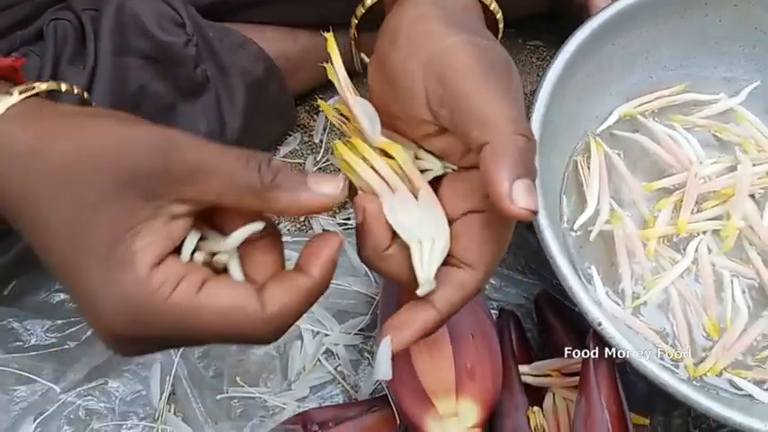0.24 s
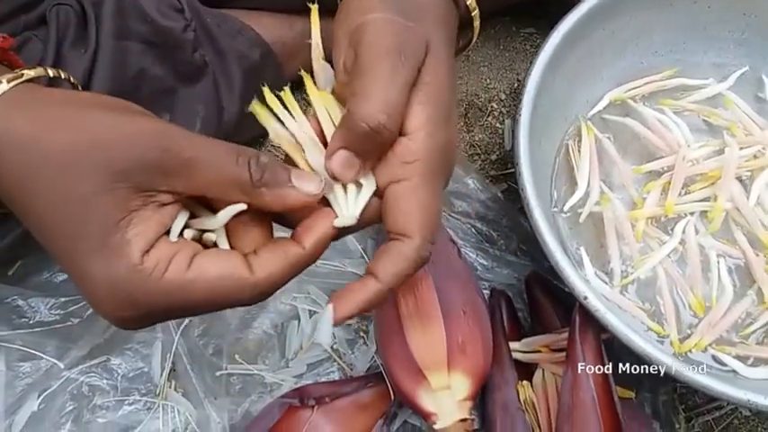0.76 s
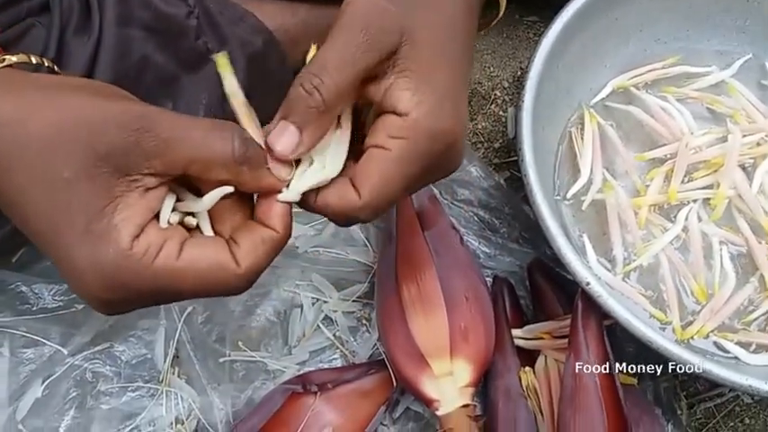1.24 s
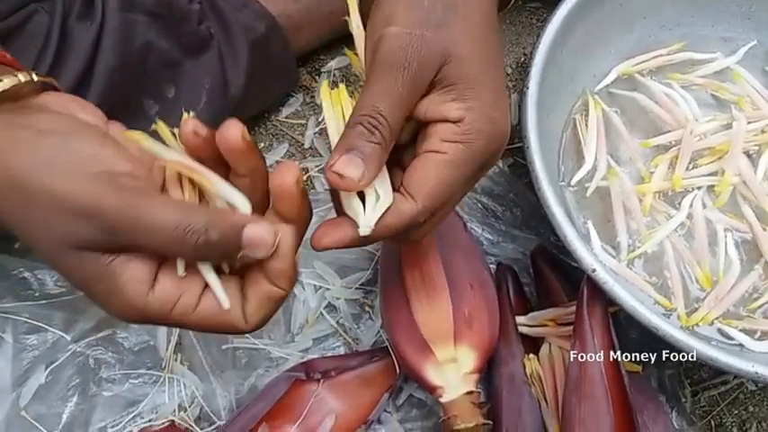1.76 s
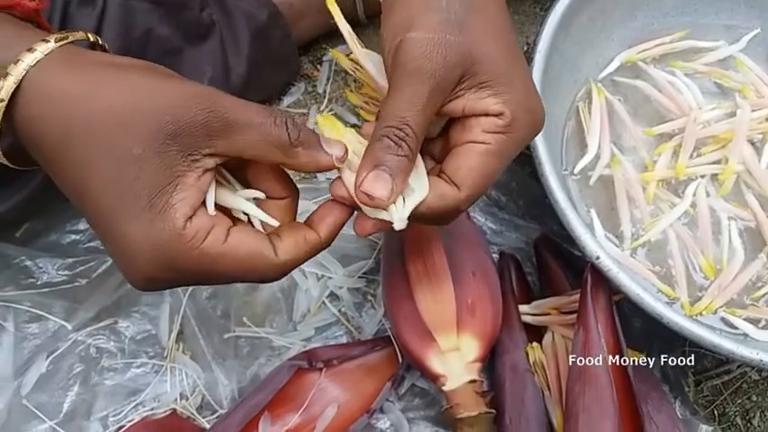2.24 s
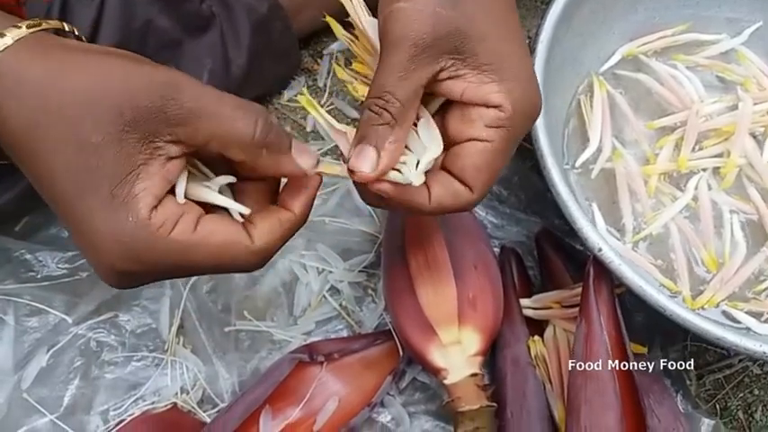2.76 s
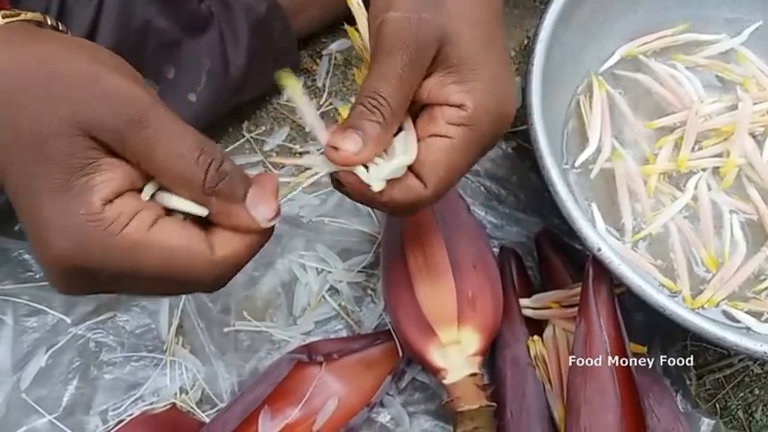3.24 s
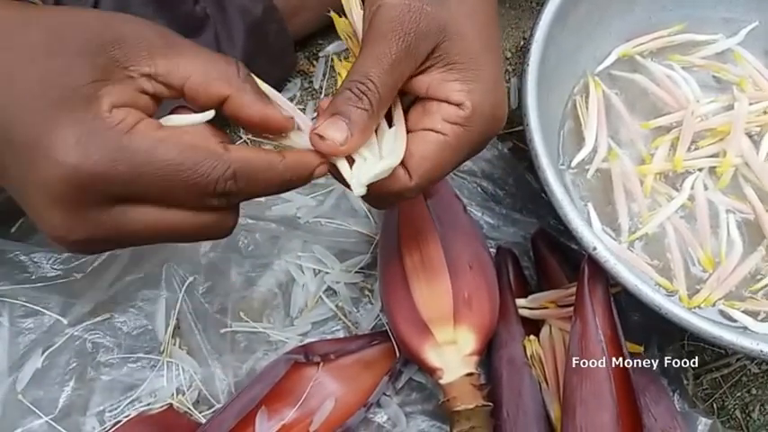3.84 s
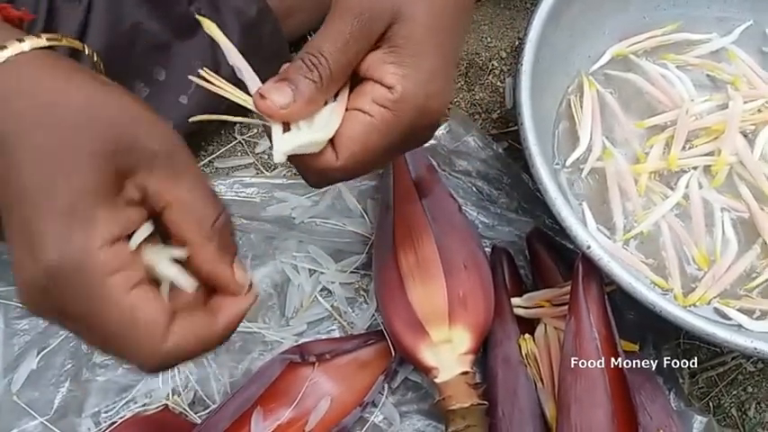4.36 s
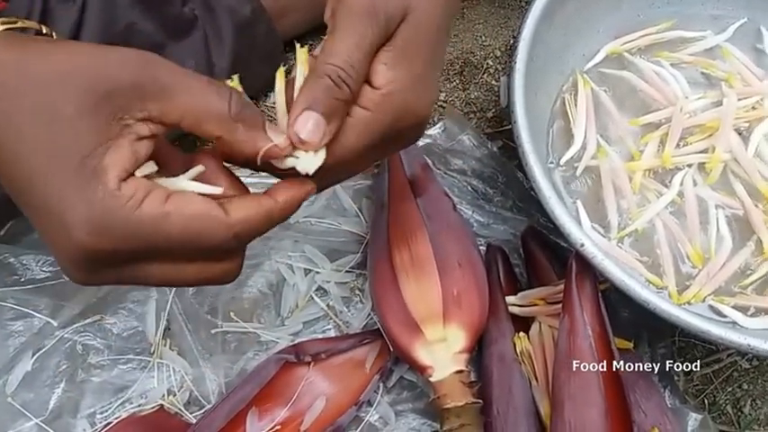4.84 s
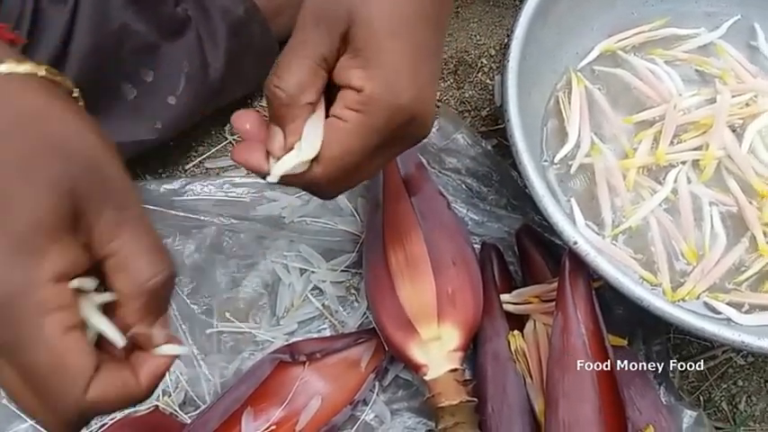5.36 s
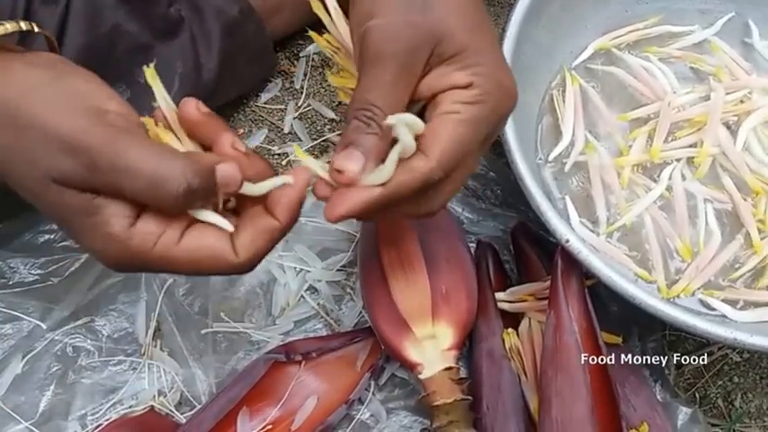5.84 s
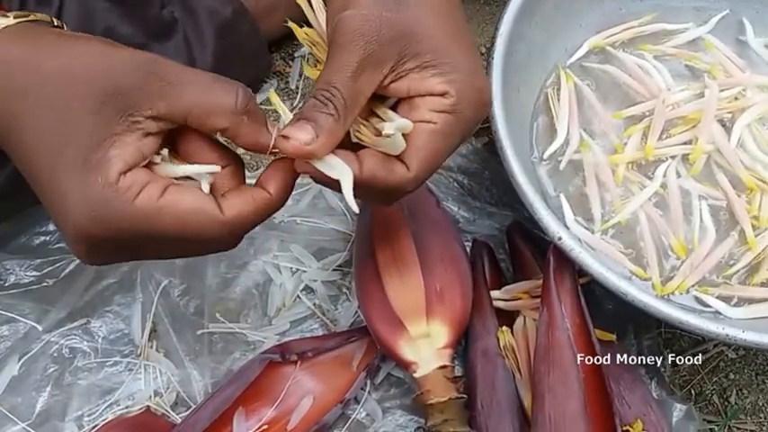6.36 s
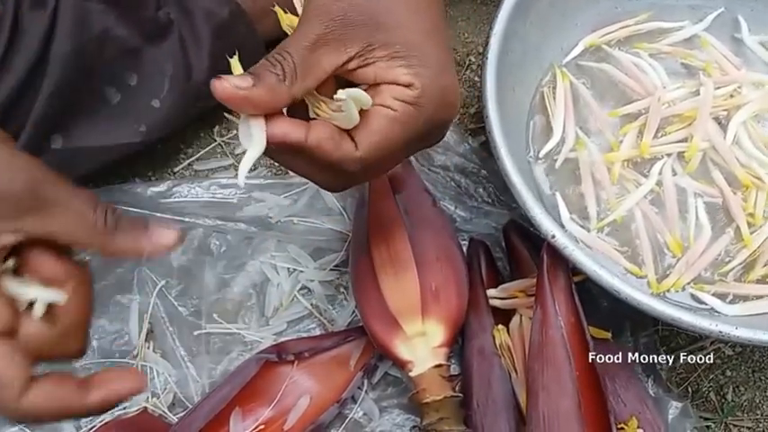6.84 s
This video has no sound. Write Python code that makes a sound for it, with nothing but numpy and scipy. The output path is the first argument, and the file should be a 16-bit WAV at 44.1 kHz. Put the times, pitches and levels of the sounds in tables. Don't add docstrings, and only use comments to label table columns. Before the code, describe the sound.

Crisp little stem snaps and soft petal rustles up close, with five fluttering crow caws, faint bird chatter and a low puttering engine behind.

```python
import sys
import numpy as np
from scipy import signal
from scipy.fft import rfft, irfft
from scipy.io import wavfile
from scipy.ndimage import uniform_filter1d

SR = 44100
rng = np.random.default_rng(int(sys.argv[2]) if len(sys.argv) > 2 else 0)


def master_out(mix):
    frames = np.transpose(np.atleast_2d(mix))
    ceiling = np.clip(frames, -1, 1)
    pcm = np.round(ceiling * 32767).astype(np.int16)
    wavfile.write(sys.argv[1], SR, pcm)


def attenuation_scalar(level_db):
    decades = np.asarray(level_db, float) / 20
    return 10 ** decades


N = 312669


def rms_one(x):
    return x / np.sqrt(np.mean(x ** 2) + 1e-20)


def even(x, size=1300):
    return x / np.sqrt(uniform_filter1d(x ** 2, size=size) + 1e-12)


def short_of(t, length):
    return np.clip(1 - t / length, 0, 1)


def span(start, length):
    at = np.arange(int(start * SR), min(int((start + length) * SR), N))
    fade = np.minimum(1, np.minimum(at - at[0], at[-1] - at) / (0.0016 * SR))
    return at, fade, at / SR - start


def drift(rate_hz, size):
    r = np.exp(-2 * np.pi * rate_hz / SR)
    noise = rng.standard_normal(size + SR)
    return rms_one(signal.lfilter([1], [1, -2 * r, r * r], noise)[SR:])


def resonate(x, modes):
    out = 0
    for k, (hz, width_hz, db) in enumerate(modes):
        r = np.exp(-np.pi * width_hz / SR)
        zeros = [(1 - r * r) / 2, 0, (r * r - 1) / 2]
        poles = [1, -2 * r * np.cos(2 * np.pi * hz / SR), r * r]
        out = out + (-1) ** k * attenuation_scalar(db) * signal.lfilter(zeros, poles, x)
    return out


def bursts(times, db, lengths):
    out = np.zeros(N + SR)
    for s, level_db, length in np.broadcast(times, db, lengths):
        u = np.arange(int(8 * length * SR)) / (length * SR)
        i = int(max(s, 0) * SR)
        out[i:i + len(u)] += attenuation_scalar(level_db) * (1 - np.exp(-6.0 * u)) * np.exp(-u)
    return out[:N]


def air():
    # f/Hz, density/dB
    air_colour = [(160, -30), (280, 1), (497, -4.5), (853, -3), (960, -6), (1060, -2.5), (2270, -5),
                  (2730, -6), (3070, -6), (6460, -21.5), (7910, -20.5), (9520, -25.5), (15800, -25)]
    # f/Hz, level/dB
    air_bass = [(40, -18), (90, 9), (140, 5.5), (190, 9.5), (230, 6.5), (270, -9), (340, -1), (450, -1.24)]
    # f/Hz, width/Hz, gain
    mic_peak = (7980, 480, 2.9)
    level_db, top_hz = -53.5, 15850
    bins_hz = np.arange(N // 2 + 1) * SR / N
    colour_db = 0
    for table in (air_colour[1:], air_bass):
        hz, db = np.transpose(table)
        colour_db = colour_db + np.interp(np.log(bins_hz + 1), np.log(hz), db)
    far = irfft(rfft(rng.standard_normal(N)) * attenuation_scalar(colour_db) * (bins_hz < top_hz), N)
    peak_hz, peak_width_hz, peak_gain = mic_peak
    far += peak_gain * attenuation_scalar(2.74 * drift(27, N)) * resonate(far, [(peak_hz, peak_width_hz, 0)])
    high = signal.sosfilt(signal.butter(2, 300, "high", fs=SR, output="sos"), far)
    return far / np.std(high) * attenuation_scalar(level_db - 1.5 + 0.74 * drift(7.3, N))


def wind():
    # t/s, rumble level/dB, width/s
    gusts = [(.02, -42.5, .06), (.39, -45, 0.032), (.7, -46.5, 0.18), (1.05, -49, 0.031),
             (1.38, -50, 0.065), (2.2, -61, 0.4), (3.1, -54, 0.14), (3.53, -49, 0.06), (3.95, -57, 0.17),
             (4.29, -47, 0.044), (4.76, -56, .03), (5.3, -40.5, 0.12), (5.77, -48, .05), (5.96, -45, 0.043),
             (6.18, -44, .06), (6.42, -43.5, 0.051), (7.04, -43, 0.067)]
    # t/s, peak/dB, f/Hz, length/s
    bumps = [(1.02, -31.5, 92, 0.013), (3.077, -48, 69, 0.025), (3.502, -49, 69, 0.02),
             (4.243, -48, 81, 0.023), (4.278, -39, 71.4, 0.012), (5.078, -36.5, 101.3, 0.011),
             (5.239, -46, 72.7, 0.015), (5.299, -38.5, 96, 0.026), (5.376, -61, 89, 0.03),
             (5.739, -36.5, 92.5, 0.02), (6.118, -40, 62.5, 0.019), (6.995, -35, 93, 0.013)]
    calm_db = -58
    t = np.arange(N) / SR
    gusting = attenuation_scalar(calm_db)
    for s, db, width_s in gusts:
        gusting = gusting + attenuation_scalar(db) * np.exp(-.5 * ((t - s) / width_s) ** 2)
    band = signal.butter(2, [40, 95], "band", fs=SR, output="sos")
    rumble = signal.sosfilt(band, rng.standard_normal(N))
    out = even(rumble) * gusting * attenuation_scalar(-11.0 + 0.5 * drift(35, N))
    for s, db, hz, length in bumps:
        out += np.sin(2 * np.pi * hz * (t - s)) * bursts(s, db + 3.0, length)
    return out


def each_cycle(contacts, spread_db):
    # valve tick t/s, cycles done
    turning = [(-.0652, -1), (1.0252, 10), (2.0139, 20), (3.1044, 31), (4.195, 42), (5.0859, 51),
               (6.0752, 61), (7.159, 72)]
    s, cycles = np.transpose(turning)
    out = 0
    for share, db, length in contacts:
        times = np.interp(np.arange(-1, 71) + share, cycles, s)
        levels_db = db + spread_db * rng.standard_normal(len(times))
        out = out + bursts(times[times > 0], levels_db[times > 0], length)
    return out


def engine():
    # f/Hz, level/dB, T60/s
    exhaust = [(39.7, -81, 0.16), (89.4, -49, 0.096), (128.9, -53.5, 0.23), (180, -42, 0.079),
               (206.4, -47, 0.11), (244, -94, 0.086), (390, -52, 0.044)]
    # cycle share after the tick, level/dB, length/s
    firing = [(.437, 1.5, 0.0018), (.54, -6, 0.0028), (.68, 0, 0.00068), (.785, -7.5, 0.0012),
              (.9, -6.5, 0.0014)]
    # cycle share, level/dB, length/s
    valve_puffs = [(.0, -49, 0.0054), (.1, -57, 0.0034), (.19, -51.5, 0.0079), (.26, -57, 0.0057),
                   (.37, -56, 0.0033), (.45, -57, 0.0092), (.56, -57.5, 0.0064)]
    valve_ticks = [(.008, -61, 0.0012), (.51, -76, 0.003)]
    # t/s, peak/dB
    hard_ticks = [(0.2312, -43), (0.528, -46), (0.827, -49), (1.0246, -49), (1.4224, -51), (1.8158, -57),
                  (2.0138, -57), (2.4104, -52), (3.502, -49), (3.6002, -51), (3.897, -45), (4.5895, -45),
                  (4.887, -44), (5.0853, -53), (5.1837, -45), (5.3827, -46), (5.5802, -52), (5.682, -43.5),
                  (6.0746, -50), (6.4684, -48), (6.567, -51), (6.8636, -47), (6.9606, -46)]
    # f/Hz, width/Hz, level/dB
    casing = [(2722, 120, 17), (1630, 134, 6.5), (835, 24, 12), (1080, 33, -2)]
    tick_colour = [(7950, 600, 0), (4500, 2500, -13), (10000, 1500, -22)]

    push = np.diff(each_cycle(firing, 1.7), prepend=0)
    pipe = 0
    for hz, db, t60_s in exhaust:
        r = attenuation_scalar(-60 / (t60_s * SR))
        w = 2 * np.pi * hz / SR
        ring = signal.lfilter([0, np.sin(w)], [1, -2 * r * np.cos(w), r * r], push)
        pipe = pipe + attenuation_scalar(db + 1.0) / w / 60 * ring

    puffs = even(resonate(rng.standard_normal(N), casing), size=300) * each_cycle(valve_puffs, 0.55)
    s, db = np.transpose(hard_ticks)
    striking = each_cycle(valve_ticks, 2.9) + bursts(s, db - 8.5, 0.0022)
    ticks = even(resonate(rng.standard_normal(N), tick_colour), size=90) * striking
    return pipe + puffs + 1.8 * ticks


def small_birds():
    # t/s, length/s, level/dB, fading/(dB/s), low voice/dB
    chatter = [(.807, .11, -52, 90, -1), (.932, .13, -47.5, 170, -6), (1.218, .155, -51, 30, -8)]
    # t/s, length/s, f/Hz, level/dB
    whistles = [(1.05, .17, 1392, -58), (1.305, .11, 1388, -57)]
    # f/Hz, width/Hz, level/dB
    chatter_high = [(3420, 260, 6), (4250, 300, 5.5), (5000, 590, -10)]
    chatter_low = [(2400, 900, -2)]
    attack_s, silent_db = .02, -10
    slide_hz, slide_s, fade_db_per_s = 60, .03, 30

    clicks = rng.standard_normal((2, N)) * attenuation_scalar(2.2 * drift(150, N))
    high = rms_one(resonate(clicks[0], chatter_high))
    low = rms_one(resonate(clicks[1], chatter_low))
    out = np.zeros(N)
    for start, length, db, fading, low_db in chatter:
        at, fade, t = span(start, length)
        level_db = db + silent_db * short_of(t, attack_s) - fading * np.maximum(t - attack_s, 0)
        out[at] += (high[at] + attenuation_scalar(low_db) * low[at]) * attenuation_scalar(level_db) * fade

    for start, length, hz, db in whistles:
        at, fade, t = span(start, length)
        sliding_hz = hz + slide_hz * np.exp(-t / slide_s)
        wavering = attenuation_scalar(db - fade_db_per_s * t + 3.5 * drift(30, len(at)))
        out[at] += np.sin(2 * np.pi * np.cumsum(sliding_hz) / SR) * wavering * fade
    return out


def hands():
    # t/s, crack peak/dB, stem ring re crack/dB
    snaps = [(1.604, -53, -8), (1.617, -49, -12), (1.8532, -47, -6.5), (1.865, -48, -21), (1.87, -31, -31),
             (2.46, -48, -14), (2.5306, -37.5, -12.5), (2.7475, -30, -16), (2.755, -50, -9),
             (2.8864, -32.5, -12.5), (3.313, -43, -11), (3.3258, -40, -17), (3.3317, -25.5, -17),
             (3.378, -52, -18), (4.014, -68, 12.5), (4.2802, -58, 4), (4.512, -47, -11), (5.273, -56, -3),
             (5.29, -44, -13), (5.4504, -64, 4), (5.485, -52, -6), (5.503, -44, -24), (5.506, -56, -3),
             (5.6057, -60, -1), (5.752, -61, 3), (5.772, -43.5, -10), (5.793, -55, -5), (6.34, -57, -11),
             (6.6672, -23.5, -14.5), (6.675, -46, -12)]
    # slip t/s, level/dB, build-up/s
    rustle = [(1.616, -54, 0.018), (1.88, -62, 0.16), (2.466, -70, 0.11), (2.534, -49, .03),
              (3.336, -57, .015), (3.38, -74, 0.089), (3.66, -71, .04), (3.8, -66, .4), (4.284, -67, .03),
              (4.438, -60, .025), (5.292, -60, .035), (5.502, -53.5, .07), (5.78, -54, 0.066),
              (6.344, -61, .05)]
    # t/s, peak/dB, f/Hz, length/s
    knocks = [(2.8853, -37, 3700, .001), (2.886, -39, 5300, .001), (4.5135, -27, 1350, 0.0012),
              (4.5156, -42, 1000, 0.0022), (4.6665, -33, 1050, .0012), (4.668, -39, 2700, .001),
              (6.9597, -32, 1480, .003), (6.9615, -36, 3300, 0.0022), (6.9622, -29, 1430, 0.0015),
              (6.9645, -29, 1450, 0.0014), (6.9675, -36, 1500, .0015)]
    # f/Hz, width/Hz, level/dB
    snap_top = [(10800, 1600, 9.5), (15800, 3000, 6)]
    snap_colour = [(8120, 810, 0.1)]
    snap_low = [(5280, 230, 0.3), (3080, 1100, -1.7)]
    snap_s, soft_ring_db, low_follows = 0.0013, -57, 0.38
    rub_start_db, rub_release_s = -22, .025

    s, db, ring_db = np.transpose(snaps)
    body_db = db + ring_db
    low_db = soft_ring_db + low_follows * (body_db - soft_ring_db)
    white = rng.standard_normal((2, N))
    top = bursts(s, db - 8.0, snap_s)
    grain = attenuation_scalar(6.1 * drift(160, N))
    for slip, rub_db, build in rustle:
        length = build + rub_release_s
        at, fade, t = span(slip - build, length)
        ramps = short_of(t, build) + short_of(length - t, rub_release_s)
        top[at] += attenuation_scalar(rub_db + rub_start_db * ramps - 9.5) * fade * grain[at]

    body = even(resonate(resonate(white[0], snap_colour), snap_colour), size=70)
    low = even(resonate(white[1], snap_low), size=90)
    hiss = even(resonate(resonate(white[1], snap_top), snap_top), size=60)
    out = body * bursts(s, body_db + 10.5, snap_s)
    out += low * bursts(s, low_db + 9.5, snap_s)
    out += hiss * top
    for s, db, hz, length in knocks:
        out += np.sin(2 * np.pi * hz * (np.arange(N) / SR - s)) * bursts(s, db, length)
    return out


def crow():
    # t/s, length/s, level/dB, top pitch f/Hz, swell through the call/dB
    caws = [
        (0.336, 0.23, -43, 554, 0),
        (1.373, 0.25, -45, 528.6, -1),
        (2.819, .226, -45, 569.3, 4.5),
        (3.259, .235, -45.5, 541.6, -2),
        (3.705, .21, -46.5, 515, 3.5),
    ]
    # flutter f/Hz, flutter depth/pitch share, hoarseness 0-1, half-pitch share 0-1, beak/dB
    caw_voice = [(79.5, .075, .48, .5, -15), (82, .05, .65, .35, -16), (80.5, .06, .2, .9, -18),
                 (81, .075, .08, .5, -20), (80, .075, .14, .35, -19)]
    # attack/s, release/s, lower throat/dB, second harmonic/dB, end pitch share
    caw_throat = [(.135, .03, -6, -4, .9), (.055, .05, -2, -9, .91), (.05, .008, -5, -9, .85),
                  (.035, .07, -4, -3, .68), (.035, .04, -4.5, -6, .71)]
    # f/Hz, width/Hz, level/dB
    lower_throat = [(1528, 350, 7.5)]
    upper_throat = [(1940, 320, 0.1)]
    beak = [(2800, 180, 4), (3880, 170, 2.5), (5360, 770, -5)]
    silent_db, release_db, third_db, waver_db = -22.5, -11.5, -3.5, 1.8
    start_share, rise_s, fall_s = .8, .09, .09

    out = np.zeros(N)
    for call, throat, voicing in zip(caws, caw_throat, caw_voice):
        start, length, db, top_hz, swell_db = call
        attack, release, lower_db, second_db, end_share = throat
        flutter_hz, depth, hoarse, half, beak_db = voicing
        at, fade, t = span(start, length)
        size = len(at)
        opening = short_of(t, attack) ** 2
        ending = short_of(length - t, release)
        progress = t / length - .5
        effort_db = db + silent_db * opening + swell_db * progress + release_db * ending
        rise = (1 - start_share) * short_of(t, rise_s) ** 2
        fall = (1 - end_share) * short_of(length - t, fall_s) ** 2
        hz = top_hz * (1 - rise - fall)

        strain = np.clip((hz - 350) / 120, 0, 1)
        beat = 2 * np.pi * np.cumsum(flutter_hz * (1 + .2 * hoarse * drift(25, size))) / SR
        wobble = strain * depth * np.sin(beat) + .09 * hoarse * drift(200, size)
        phase = 2 * np.pi * np.cumsum(hz * (1 + wobble)) / SR
        closing = 1 + 0.3 * strain * np.cos(beat + .5)
        closing *= attenuation_scalar(4 * hoarse * drift(40, size))

        lines = sum(np.cos(k * phase) + half * np.cos((k - .5) * phase) for k in range(3, 13))
        breath = 2 * hoarse * rng.standard_normal(size) * (1 + np.cos(phase))
        voice = closing * lines + breath

        upper = even(resonate(resonate(voice, upper_throat), upper_throat))
        upper *= attenuation_scalar(effort_db - 1.1 + waver_db * drift(12.6, size))
        upper += even(resonate(voice, beak)) * attenuation_scalar(effort_db + beak_db - 0.7)
        lower = even(resonate(resonate(voice, lower_throat), lower_throat))
        lower *= attenuation_scalar(effort_db + lower_db + 1.5 + waver_db * drift(5.1, size))
        second_level_db = effort_db + second_db - max(swell_db, 0) * progress + 0.5 + 2.0 * ending
        second = closing * np.cos(2 * phase) * attenuation_scalar(second_level_db)
        lead = np.sqrt(opening * (1 - opening)) * attack / .05
        third = closing * np.cos(3 * phase) * attenuation_scalar(db + third_db) * lead
        out[at] = fade * (upper - lower + second + third)
    return out


def trees(x):
    t60_s, echo_db, gap_s = 0.68, -6, .03
    t = np.arange(int(t60_s * SR)) / SR
    tail = rng.standard_normal(len(t)) * attenuation_scalar(-60 * t / t60_s) * (t > gap_s)
    tail = signal.sosfilt(signal.butter(2, 1300, "high", fs=SR, output="sos"), tail)
    tail /= np.sqrt(np.sum(tail ** 2))
    return x + attenuation_scalar(echo_db) * signal.fftconvolve(x, tail)[:N]


def scene():
    birds = trees(crow() + small_birds())
    return (birds + engine() + hands() + wind() + air())[None]


def top_cut(x):
    return signal.sosfilt(signal.butter(12, 16650, fs=SR, output="sos"), x)


def record(dry):
    cut = signal.sosfilt(signal.butter(6, 46, "high", fs=SR, output="sos"), dry)
    cut = signal.sosfilt(signal.cheby2(10, 60, 16900, fs=SR, output="sos"), cut)
    return top_cut(cut - .0005)


dry = scene()
out = record(dry)
master_out(out)
```